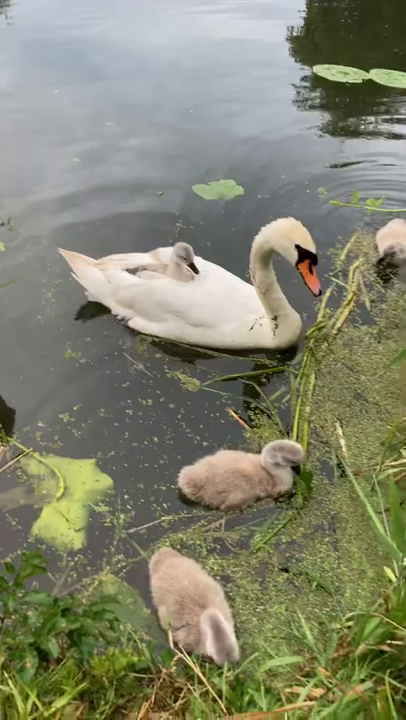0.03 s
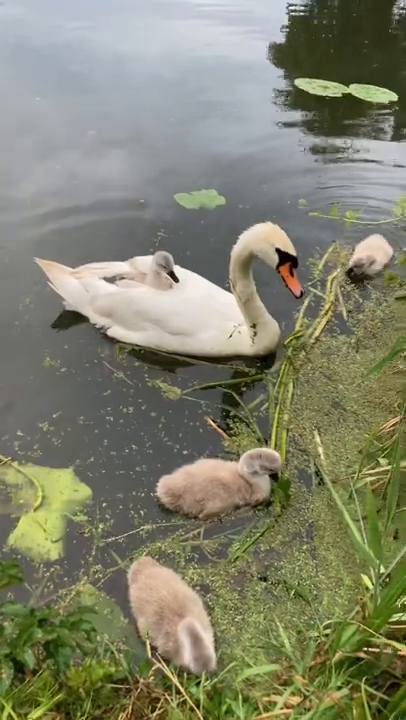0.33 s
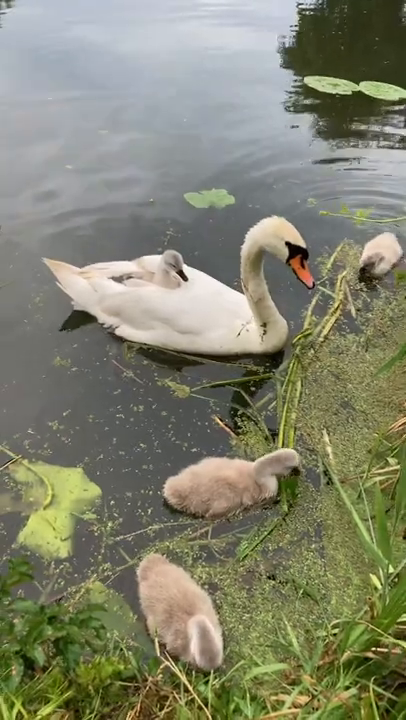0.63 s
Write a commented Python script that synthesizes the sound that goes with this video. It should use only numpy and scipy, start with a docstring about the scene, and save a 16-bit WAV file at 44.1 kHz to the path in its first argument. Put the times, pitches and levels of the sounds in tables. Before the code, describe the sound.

Young swans dabbling in a pond with small wet clicks, over a distant plane drone.

```python
"""Cygnets dabble in a weedy pond. After an instant of silence a distant engine, probably a propeller
plane, drones over a soft outdoor rush, sinking slowly in pitch. From first to last, bills snap at wet
weed, drops and tiny bubbles pop, and the bank scatters each click. The young peep faintly for the first
2.3 s. Near 2.8 s another bird chirps and a thin twitter follows; one brief chirp comes just before the
end, as the nibbling grows busy again."""
import sys
import numpy as np
from scipy import signal
from scipy.fft import rfft, irfft
from scipy.io import wavfile

SR = 44100
rng = np.random.default_rng(int(sys.argv[2]) if len(sys.argv) > 2 else 0)


def transcribe(u):
    """Save the signal u as a 16-bit wav file named by the first command-line argument.

    u: samples, shape (n,) or (channels, n), limited to [-1, 1]; the rate is SR.
    q: integer samples, one column per channel.
    """
    v = np.clip(np.atleast_2d(u).T, -1, 1)
    q = np.round(v * 32767).astype(np.int16)
    wavfile.write(sys.argv[1], SR, q)


N = 176400


def from_db(db):
    """Logarithmic level: 20 dB is a tenfold amplitude."""
    return 10 ** (np.asarray(db) / 20)


def rms_one(x):
    """Normalisation to unit mean power."""
    return x / np.sqrt(np.mean(x ** 2) + 1e-20)


def in_time(rows):
    """Linear interpolation of (time [s], value) rows at every sample."""
    return np.interp(np.arange(N) / SR, *np.transpose(rows))


def drift(corner_hz):
    """Low-pass filtered noise: a slow random fluctuation of unit rms."""
    step, settle = 40, 2000
    pole = np.exp(-2 * np.pi * corner_hz * step / SR)
    white = rng.standard_normal(N // step + settle + 2)
    slow = signal.lfilter([1], [1, -2 * pole, pole ** 2], white)[settle:]
    return np.interp(np.arange(N) / step, np.arange(len(slow)), rms_one(slow))


def noise(spectrum):
    """Spectral shaping: white noise weighted by (frequency [Hz], level [dB]) rows, at unit rms."""
    hz, db = np.transpose(spectrum)
    bins_hz = np.maximum(np.fft.rfftfreq(N, 1 / SR), 1)
    gain = from_db(np.interp(np.log(bins_hz), np.log(hz), db))
    return rms_one(irfft(rfft(rng.standard_normal(N)) * gain, N))


def butter(x, hz, kind):
    """Maximally flat filtering, second order at each edge."""
    return signal.sosfilt(signal.butter(2, hz, kind, fs=SR, output="sos"), x)


def add(out, start_s, sound):
    """Superposition: a sound adds to the mix from its start time."""
    i = int(start_s * SR)
    out[i:i + len(sound)] += sound[:N - i]


# Spectrum of the microphone hiss: (frequency [Hz], relative density [dB])
HISS_SPECTRUM = [(1000, 13), (2000, 7), (3200, 5), (5000, 5.5), (7000, 5.5), (9000, -3.5), (12000, -18),
                 (16000, -25)]

def microphone_hiss(level_db=-70):
    """Stationary broadband noise: a steady microphone hiss forms the noise floor."""
    return from_db(level_db) * noise(HISS_SPECTRUM)


# Spectrum of the plane's rush: (frequency [Hz], relative density [dB])
RUSH_SPECTRUM = [(25, -17), (40, -26.5), (58, 8), (85, 6), (130, 3.5), (250, 3.5), (450, -0.5), (650, 2),
                 (900, 3), (1200, -3.5), (1600, -13.5), (2400, -30)]
# Envelope of the rush: (time [s], level [dB])
RUSH_LEVEL = [(0.1, -55), (.4, -56), (.8, -59.5), (1.2, -56.5), (1.6, -55.5), (2.2, -56), (2.65, -53),
              (3.0, -56.5), (3.5, -55.5), (4, -56)]

def plane_rush(blade_phase, throb_depth=0.16):
    """Amplitude modulation: the rush throbs once with each passing blade."""
    throb = 1 + throb_depth * np.cos(blade_phase)
    return from_db(in_time(RUSH_LEVEL)) * noise(RUSH_SPECTRUM) * throb


def ground_smear(x, centre_hz=120, width_hz=100):
    """Group delay: an all-pass filter makes the bass of each blade pulse a few milliseconds late."""
    radius = np.exp(-np.pi * width_hz / SR)
    denominator = [1, -2 * radius * np.cos(2 * np.pi * centre_hz / SR), radius ** 2]
    return signal.lfilter(denominator[::-1], denominator, x)


# Harmonics of the blade rate, from the first up: (relative level [dB])
BLADE_HARMONICS = [0.5, -2.5, -3, -7, -14, -18.5, -19, -21, -26.5, -31.5, -28, -31.5]
# Boost of all harmonics above the first: (time [s], gain [dB])
OVERTONE_GAIN = [(0.1, 2.5), (.8, 1), (1.4, 1.5), (2.0, 1.6), (2.7, 1.1), (3.2, -1), (4, 2.1)]
# Envelope of the drone: (time [s], relative level [dB])
DRONE_LEVEL = [(0.1, -53), (0.2, -49), (0.76, -49.5), (1.83, -46.5), (2.44, -46.5), (2.51, -45),
               (2.86, -45.5), (3.87, -46.5), (3.95, -47)]

def propeller_drone(blade_phase, gain_db=1, waver_db=0.3123, waver_rad=0.12, waver_hz=1.19):
    """Periodic blade pulses form a harmonic series; each term wavers in the air, more at higher order."""
    overtone_db = in_time(OVERTONE_GAIN)
    drone = np.zeros(N)
    for order, db in enumerate(BLADE_HARMONICS, 1):
        level_db = db + (order > 1) * overtone_db + order * waver_db * drift(waver_hz)
        phase = order * (blade_phase + waver_rad * drift(waver_hz))
        drone += from_db(level_db) * np.cos(phase)
    return from_db(gain_db + in_time(DRONE_LEVEL)) * rms_one(ground_smear(drone))


# Blade-passage rate of the propeller: (time [s], frequency [Hz])
BLADE_RATE = [(0.1, 84.8), (.7, 84.4), (1.3, 83.63), (1.8, 83.68), (2.25, 84.42), (2.7, 84.24),
              (3.05, 83.94), (3.6, 83.45), (4, 83.56)]

def plane():
    """Phase is the integral of frequency: one blade phase drives both drone and rush."""
    blade_phase = 2 * np.pi * np.cumsum(in_time(BLADE_RATE)) / SR
    return propeller_drone(blade_phase) + plane_rush(blade_phase)


# Thin, buzzy bird notes: (start [s], end [s], centre [Hz], bandwidth [Hz], level [dB])
TWITTERS = [(2.813, 2.853, 6360, 1110, -70), (2.846, 2.95, 6150, 1010, -66.5)]

def twitter(grain_db=4):
    """Random amplitude modulation roughens narrow-band noise into high notes that swell and fade."""
    out = np.zeros(N)
    for start, end, hz, width_hz, db in TWITTERS:
        envelope = np.sqrt(np.hanning(int((end - start) * SR)))
        band = butter(rng.standard_normal(N), [hz - width_hz / 2, hz + width_hz / 2], "band")
        voice = band * from_db(grain_db * drift(100))
        add(out, start, from_db(db) * envelope * rms_one(voice[:len(envelope)]))
    return out


def whistle(hz, db, flutter_db, jitter):
    """Frequency and amplitude modulation: a near-pure tone wavers as it swells and fades."""
    n = len(hz)
    wavering_hz = hz * (1 + jitter * drift(93)[:n])
    phase = 2 * np.pi * np.cumsum(wavering_hz) / SR
    envelope = np.sqrt(np.sin(np.pi * np.arange(n) / n))
    return from_db(db + flutter_db * drift(42)[:n]) * envelope * np.sin(phase)


# Calls of another bird: (time [s], duration [s], pitch at the ends [Hz], at the turn [Hz], level [dB])
CHIRPS = [(2.748, .087, 1870, 2480, -60), (3.828, 0.019, 2708, 2651, -58)]

def chirps():
    """An arched frequency sweep: each whistle bends away from its first pitch and returns."""
    out = np.zeros(N)
    for start, duration, ends_hz, turn_hz, db in CHIRPS:
        progress = np.linspace(0, 1, int(duration * SR))
        hz = ends_hz + (turn_hz - ends_hz) * np.sin(np.pi * progress ** 1.34)
        add(out, start, whistle(hz, db, flutter_db=1.5, jitter=.003))
    return out


# Calls of the cygnets: (time [s], duration [s], first pitch [Hz], last pitch [Hz], level [dB])
PEEPS = [(.14, .2, 5250, 4950, -81), (.52, .13, 5050, 4500, -81), (.99, .09, 4600, 4150, -79),
         (1.17, .09, 4600, 4100, -79), (1.40, .08, 4550, 4200, -77), (1.49, .09, 4200, 3950, -75),
         (1.66, .07, 4700, 4150, -74), (1.84, .085, 4950, 4620, -67), (2.21, .05, 5500, 5100, -71),
         (2.26, .05, 3900, 3400, -75)]

def peeps():
    """A falling frequency sweep: each faint whistle slides down and levels off."""
    out = np.zeros(N)
    for start, duration, first_hz, last_hz, db in PEEPS:
        progress = np.linspace(0, 1, int(duration * SR))
        hz = last_hz + (first_hz - last_hz) * (1 - progress) ** 1.46
        add(out, start, whistle(hz, db, flutter_db=3, jitter=.018))
    return out


def ring(impulses, hz, t60):
    """Damped resonance: each impulse starts a sine that falls 60 dB in t60 seconds."""
    radius, angle = from_db(-60 / (t60 * SR)), 2 * np.pi * hz / SR
    return signal.lfilter([0, np.sin(angle)], [1, -2 * radius * np.cos(angle), radius ** 2], impulses)


# How busily the birds nibble: (time [s], gain of pop rate and amplitude [dB])
FEEDING_ACTIVITY = [(0.1, 12), (.45, 0.5), (.6, -4), (.8, 1), (1.2, -1.5), (1.7, -1.5), (2.25, 3.5),
                    (2.45, -4.5), (2.75, 0.5), (3.0, -5), (3.45, 3), (3.7, -0.5), (3.9, 8.5)]

def nibbles(base_per_s=120, base_db=-64, spread_db=4, ceiling_db=-56, ring_cycles=18):
    """A random point process: tiny bubbles pop, more often and louder when the birds are busy."""
    busy_db = in_time(FEEDING_ACTIVITY)
    pop_db = np.minimum(base_db + busy_db + spread_db * rng.exponential(1, N), ceiling_db)
    amplitudes = from_db(pop_db) * rng.choice([-1, 1], N)
    pops = amplitudes * (rng.random(N) < base_per_s * from_db(busy_db) / SR)
    pitches_hz = np.geomspace(2300, 7800, 16)
    pitch_index = rng.integers(0, len(pitches_hz), N)
    return sum(ring(pops * (pitch_index == k), hz, ring_cycles / hz) for k, hz in enumerate(pitches_hz))


def wet_cavity(t, hz, t60, contact_s=.0001, crackle_db=-16, crackle_s=.003, crackle_octaves=1.3):
    """Cavity resonance: a brief ring and a wet crackle around its pitch, with little top treble."""
    cavity = np.sin(2 * np.pi * hz * t) * from_db(-60 * t / t60) * (1 - np.exp(-t / contact_s))
    edges_hz = hz * 2 ** (crackle_octaves * np.array([-.5, .5]))
    band = rms_one(butter(rng.standard_normal(len(t)), edges_hz, "band"))
    crackle = from_db(crackle_db) * band * np.exp(-t / crackle_s)
    return signal.sosfilt(signal.butter(10, 8300, fs=SR, output="sos"), cavity + crackle)


def contact_tick(t, spray_db=-14.5, spray_s=.0085, band_hz=(1830, 12500), soften_hz=6800):
    """Impact transient: an impulse and decaying spray, their treble softened by the wet contact."""
    impulse = t == 0
    spray = from_db(spray_db) * rng.standard_normal(len(t)) * np.exp(-t / spray_s)
    pole = np.exp(-2 * np.pi * soften_hz / SR)
    return signal.lfilter([1 - pole], [1, -pole], butter(impulse + spray, band_hz, "band"))


# Bill snaps and drops: (time [s], ring level [dB], resonance [Hz], t60 [s], relative tick level [dB])
SNAPS = [(0.189, -35.5, 5660, 0.0027, -69), (0.3577, -45, 4900, 0.0043, -59),
         (.409, -43, 3280, 0.0072, -55), (0.4314, -41, 5700, 0.005, -58), (0.473, -44, 4640, 0.0064, -60),
         (0.7106, -52, 2620, 0.0051, -58), (.729, -42.5, 4160, 0.0016, -55),
         (0.7779, -45, 2850, 0.011, -56), (0.7887, -43.5, 3000, 0.0051, -62),
         (0.8225, -49, 4500, 0.0072, -70), (0.93, -47, 2900, 0.0028, -44), (0.9737, -44, 3040, 0.0047, -60),
         (1.1178, -33, 5500, 0.0032, -42.5), (1.2995, -42, 1910, 0.012, -57),
         (1.3007, -38.5, 3860, 0.012, -48), (1.4742, -47, 8344, 0.0072, -56),
         (1.5287, -49, 4000, 0.0066, -69), (1.6667, -39, 2656, 0.0039, -64),
         (1.703, -43.5, 6000, .004, -69), (1.7397, -49, 4940, 0.012, -72), (1.798, -47, 4706, 0.0034, -51),
         (1.863, -47.5, 6600, 0.0044, -51), (1.928, -36.5, 3500, 0.009, -42),
         (2.0242, -46.5, 3520, 0.0035, -60), (2.0581, -34.5, 6720, 0.0054, -47),
         (2.1252, -48, 2920, 0.0067, -66), (2.126, -45, 6240, 0.0059, -67), (2.198, -48, 3300, .005, -61),
         (2.218, -39, 4040, 0.0031, -60), (2.25, -37, 5800, 0.0035, -62), (2.256, -30, 6340, 0.0098, -75),
         (2.296, -50, 3410, 0.024, -72), (2.384, -48.5, 2700, .006, -75), (2.579, -45, 3500, 0.012, -51),
         (2.862, -42.5, 2050, .005, -57), (2.883, -44, 5770, 0.0067, -60),
         (2.915, -51.5, 3460, 0.0075, -52), (3.0043, -42, 3500, .010, -41), (3.023, -47, 2980, 0.0059, -56),
         (3.1044, -31, 3700, 0.005, -44.5), (3.184, -51, 8000, .004, -48), (3.213, -50, 7500, 0.0039, -52),
         (3.2544, -40, 6430, 0.0027, -44), (3.322, -47, 2260, .005, -48), (3.333, -45.5, 4850, .006, -58),
         (3.396, -42.5, 2950, 0.0038, -55), (3.4012, -30, 6940, 0.0029, -50),
         (3.416, -46, 3300, 0.0051, -54), (3.459, -45.5, 3700, .007, -62), (3.481, -48, 3920, 0.0057, -54),
         (3.557, -47.5, 1663, .007, -53), (3.5681, -35.5, 5770, .006, -45),
         (3.5694, -44.5, 3364, .005, -42), (3.6027, -49, 2800, .007, -67), (3.831, -53, 2744, 0.0059, -54),
         (3.92, -49, 3620, 0.0045, -54)]

def bill_snaps(tick_gain_db=4.5, reflection_s=.0015, reflection_db=-2):
    """Impulse excitation: each snap ticks and rings a small cavity; the water reflects the tick."""
    out, t = np.zeros(N), np.arange(SR // 20) / SR
    for start, ring_db, hz, t60, tick_db in SNAPS:
        cavity = from_db(ring_db) * wet_cavity(t, hz, t60)
        tick = from_db(tick_gain_db + tick_db) * contact_tick(t)
        add(out, start, cavity + tick)
        add(out, start + reflection_s, from_db(reflection_db) * tick)
    return out


def scatter(x, level_db, t60):
    """Diffuse reflection: reeds and bank throw back an exponentially decaying tail."""
    t = np.arange(SR // 3) / SR
    tail = butter(rng.standard_normal(len(t)), 6000, "low") * from_db(-60 * t / t60)
    return from_db(level_db) * signal.fftconvolve(x, tail / np.linalg.norm(tail))[:N]


def scene():
    """Superposition in mono: feeding close by, more reverberant calls further out, the plane far off."""
    feeding = bill_snaps() + nibbles()
    calls = peeps() + chirps() + twitter()
    echoes = scatter(feeding, level_db=-11, t60=.05) + scatter(calls, level_db=-8, t60=.11)
    return (plane() + microphone_hiss() + echoes + calls + feeding)[None]


def record(dry, start_s=.08, cutoff_hz=15800):
    """Gating and band limiting: sound begins after a moment of silence, and the top treble is cut."""
    gate = np.arange(N) / SR >= start_s
    return signal.sosfilt(signal.ellip(12, .1, 70, cutoff_hz, fs=SR, output="sos"), dry * gate)


dry = scene()
out = record(dry)
transcribe(out)
```